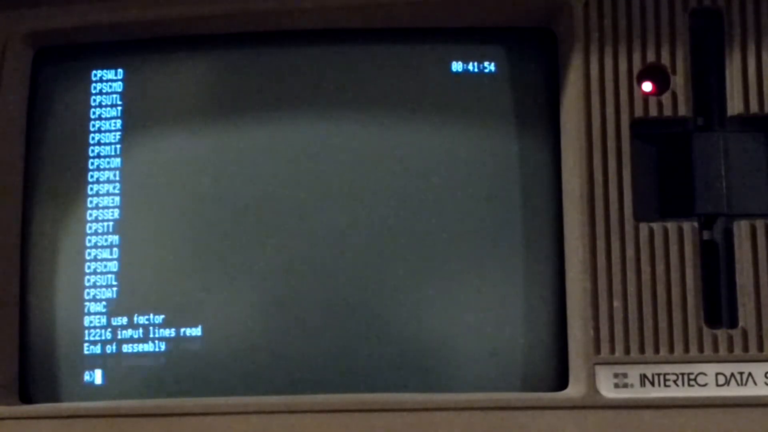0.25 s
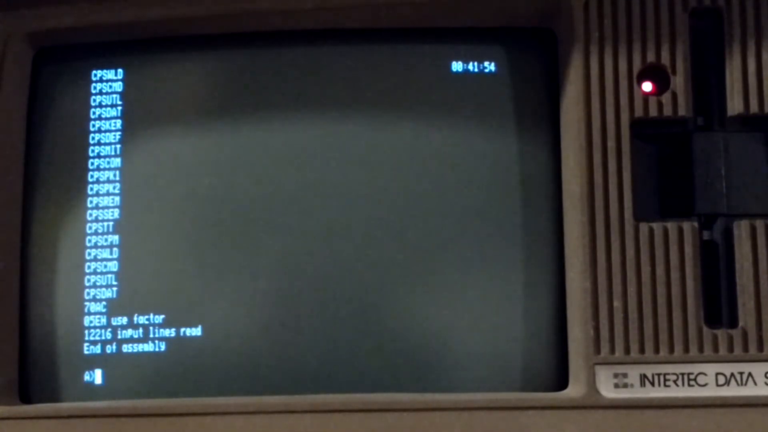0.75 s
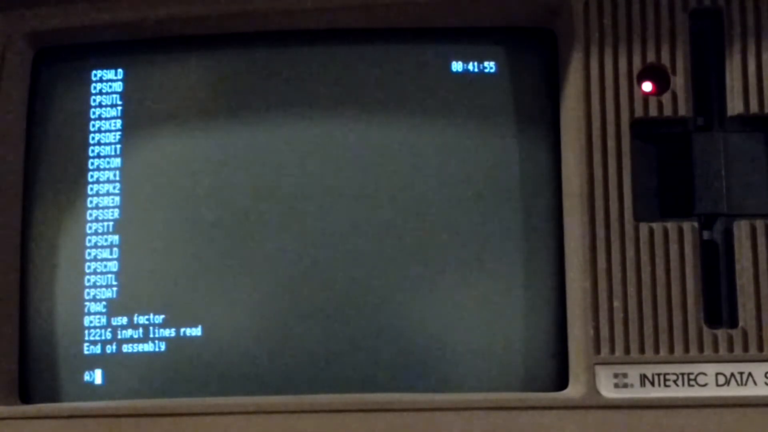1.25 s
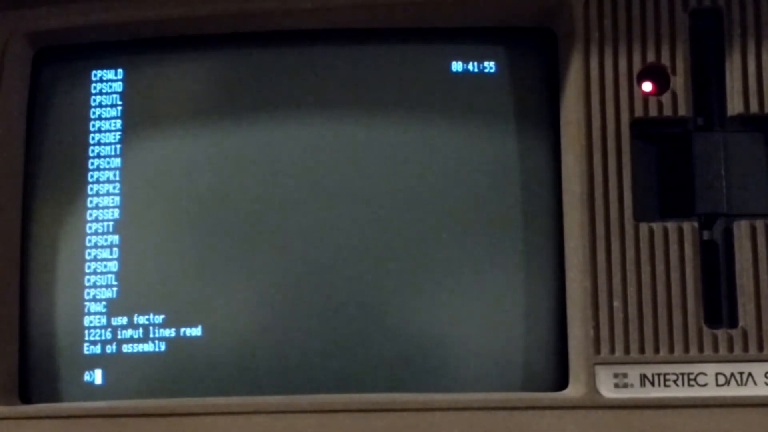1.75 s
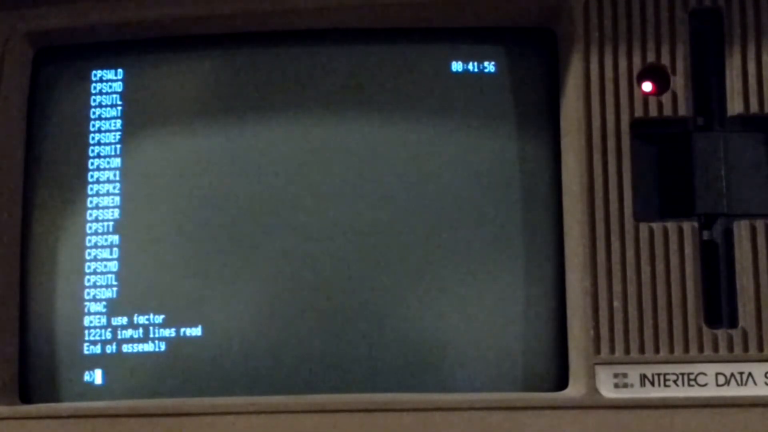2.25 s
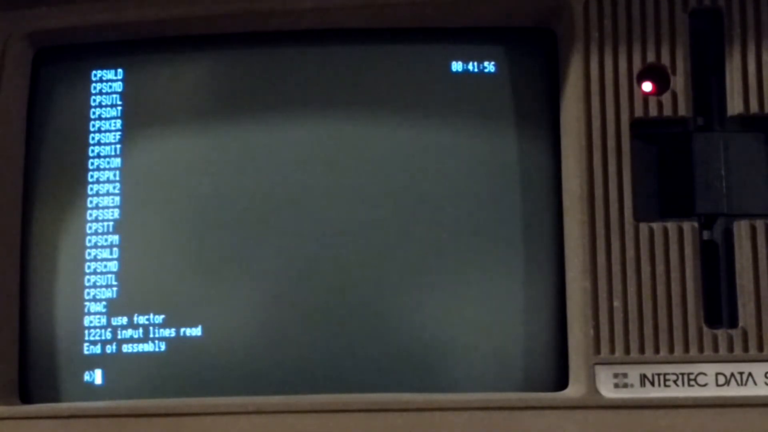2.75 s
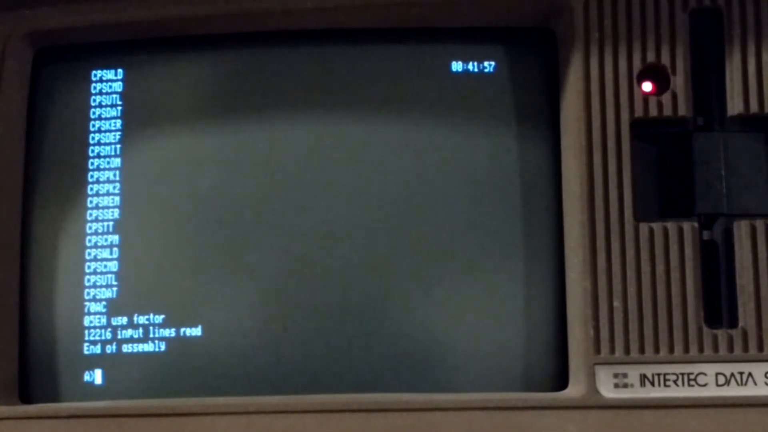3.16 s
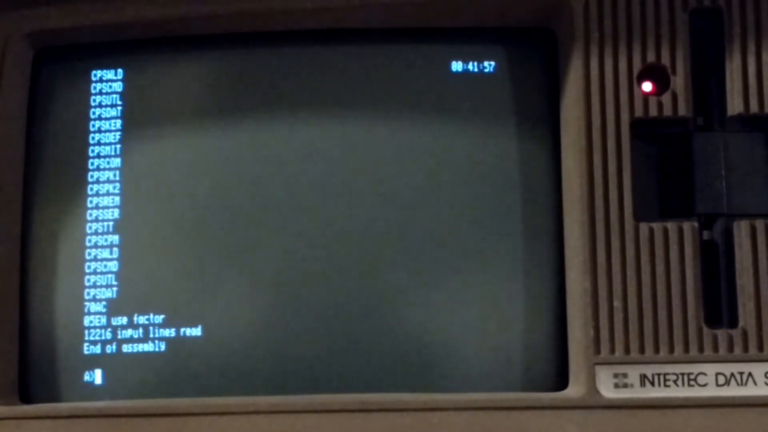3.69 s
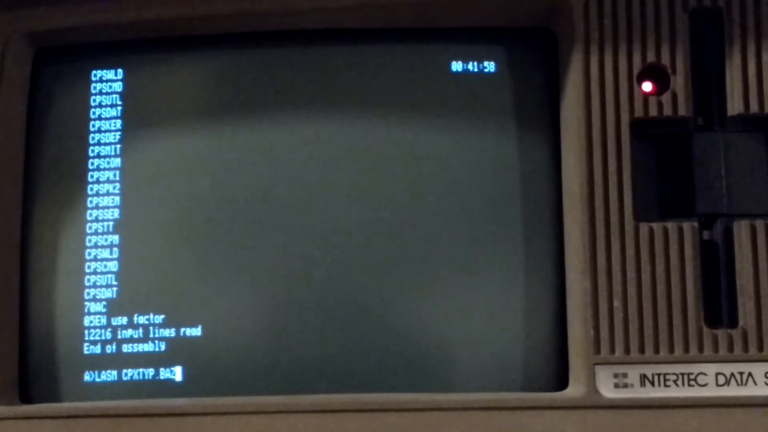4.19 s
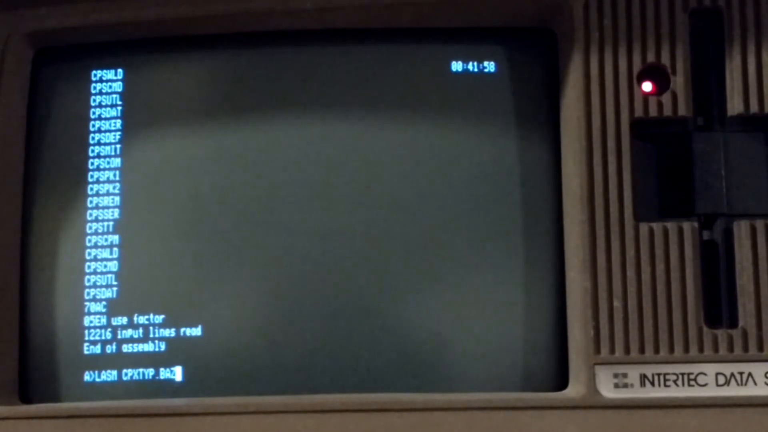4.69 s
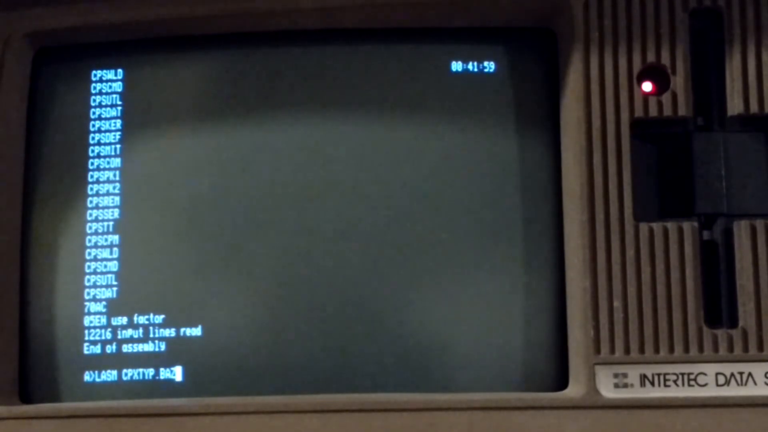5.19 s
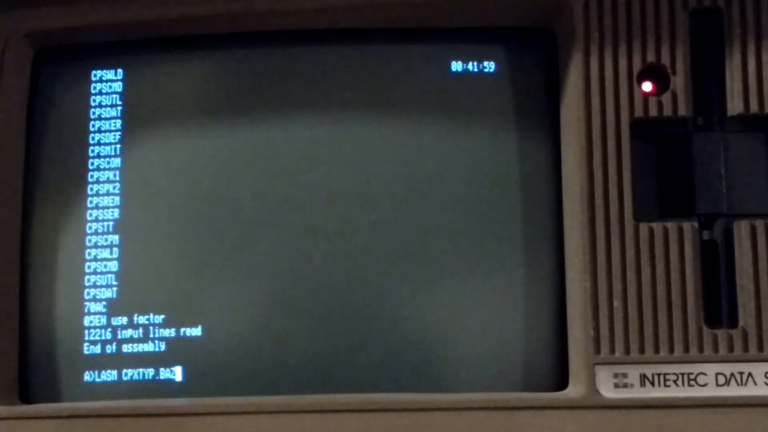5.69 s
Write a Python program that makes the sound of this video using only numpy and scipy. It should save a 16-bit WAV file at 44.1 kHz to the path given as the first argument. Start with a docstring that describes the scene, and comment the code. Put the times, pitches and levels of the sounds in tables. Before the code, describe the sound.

An old computer's floppy drive knocks, then buzzes through two long rattling head sweeps over a steady motor and fan hum, ending with scattered clunks.

```python
"""A hum of spindle motor and fan, with a disk rub that soon fades, then the knocks of a floppy drive's head.
An old desktop computer stands in a room, close to two small microphone ports. Each step of the head sums
ringing frame modes, a low thump and noise bursts for the carriage tick; shaped noise with frame modes snaps
now and then, and a small spring squeaks once. Wavering sines make the motor lines and the picture tube's whine,
coloured noise the fan and disk; the room answers the head with decaying noise."""
import sys
import numpy as np
from scipy import signal
from scipy.fft import rfft, irfft, next_fast_len
from scipy.io import wavfile
from scipy.ndimage import map_coordinates

SR = 44100
rng = np.random.default_rng(int(sys.argv[2]) if len(sys.argv) > 2 else 0)


def materialize(psi):
    """Save the field psi as 16-bit PCM at rate SR to the path in sys.argv[1].

    A 1-D psi becomes a single channel; in a 2-D psi each row is a channel.
    """
    bounded = np.clip(np.atleast_2d(psi).T, -1, 1)
    quanta = np.round(bounded * 32767).astype(np.int16)
    wavfile.write(sys.argv[1], SR, quanta)


N = 261925

# Scattered sound of the room. Each row: frequency in Hz, time to fall 60 dB in s.
ROOM_T60 = [(150, 0.61), (800, 0.013), (4000, 0.45), (12000, 0.13)]
# Colour of the room's answer. Each row: frequency in Hz, gain in dB against the direct sound.
ROOM_GAIN = [(130, -20), (300, -5), (450, -9), (900, -14), (2000, -14), (2500, -23), (3000, -13),
             (4200, -11), (4950, -24), (5700, -11), (7000, -9), (13000, -12)]
# Phase between the two microphone ports. Each row: frequency in Hz, lead of the left port in radians.
PORT_LEAD = [(110, 1.5), (180, 1.3), (280, .6), (450, .7), (650, 1), (800, .55), (950, .25), (1250, .1),
             (1700, .4), (2300, 0)]
# Balance of the two ports. Each row: frequency in Hz, left level minus right level in dB.
PORT_BALANCE = [(170, .5), (330, -2), (490, -7), (700, -.8), (1200, 0), (2600, 0), (3000, -3), (3700, 0),
                (5100, 0), (5700, -2.5), (8300, -2.5), (10000, 0)]
# Colour of the fan's air. Each row: frequency in Hz, relative density in dB per Hz.
FAN_AIR = [(25, -14), (65, -75), (110, 0), (180, -2), (300, -5.5), (415, -5.5), (460, 7), (565, -2.5),
           (670, 8), (780, -6), (860, 1), (990, -0.5), (1150, -10.5), (1550, -7), (2200, -51), (5000, -99)]
# Colour of the spinning disk's hiss. Each row: frequency in Hz, relative density in dB per Hz.
DISK_HISS = [(600, 1.5), (2000, 10), (3400, 7.5), (4600, -2), (7000, 1.5), (8700, 1.5), (11000, -4),
             (15500, -14)]
# Steady lines of spindle motor and fan. Each row: frequency in Hz, mean rms level in dB at the source.
MOTOR_LINES = [(178.8, -56.5), (317, -67), (346, -67), (441.6, -53.5), (473.7, -55), (505.8, -55),
               (606, -71), (636, -68.5), (669.5, -54), (694, -59.5), (855.9, -63.5), (942.1, -62.5),
               (1004, -62), (1283, -66)]
# Level of the disk rubbing in its jacket. Each row: time in seconds, rms level in dB before the flutter.
RUB_LEVEL = [(0, -51.5), (.22, -53.5), (.4, -60.5), (.6, -68), (5.94, -89)]
# Colour of that rub. Each row: frequency in Hz, relative density in dB per Hz.
JACKET_RUB = [(900, -34), (1600, 14.5), (1800, 22), (2000, 13.5), (4200, 7), (6000, 3), (12000, -53)]
# Squeaks of the spring as the head settles. Each row: start in seconds, relative level in dB.
SPRING_SQUEAKS = [(3.097, -24)]
# Moves of the head. Each row: start in seconds, number of steps, direction (+1 in, -1 out),
# relative knock level in dB, relative tick level in dB.
HEAD_MOVES = [(0.174, 2, 1, -35.5, -55), (0.452, 2, 1, -29.5, -46), (0.8826, 32, 1, -31, -42.5),
              (2.02, 36, -1, -30, -45), (3.726, 2, 1, -36, -52), (3.998, 2, 1, -31, -45),
              (4.549, 3, 1, -32.5, -42), (4.641, 1, 1, -30, -38.5), (5.134, 1, 1, -33, -43.5),
              (5.933, 1, 1, -28, -55)]
# Pull of the motor's four coils. Each entry: extra level in dB.
COIL_PULL_DB = [5.5, 3.14, -1.5, 1.2]
# Steps harder or softer than the rest of their move. Each row: time in seconds, extra knock in dB,
# extra tick in dB.
UNEVEN_STEPS = [(0.883, -3.5, -1.5), (0.913, -1, -1), (0.943, -2.5, 3), (0.973, 3.5, 4), (1.063, 0.5, 2),
                (1.093, 2, 4), (1.123, 1, 1), (1.213, 1, 4.5), (1.243, 0.5, -1), (1.303, -2.5, 0),
                (1.333, -0.5, 3), (1.513, 1, 2), (1.543, 2.5, 0), (1.663, 2, 1), (1.813, 0, -3),
                (2.02, 2, -2), (2.05, 0.5, 3), (2.08, -2, 4), (2.26, 2.5, 3), (2.32, 2, 3.5),
                (2.44, 2, -1.5), (2.5, 0, -0.5), (2.53, 1.5, -4), (2.59, 3.5, -1), (2.8, 0.5, -3),
                (2.83, 2, 4), (2.98, -2, 0), (3.01, -1.5, -4), (4.549, -1.5, -3), (4.609, 3, 1.5)]
# Lateness of the rotor, one row for each coil. Each row: delay inward in s, delay outward in s.
COIL_DELAY = [(0, -.00008), (-.00023, -.00016), (.00069, -.00005), (-.00044, .00029)]
# The drive rocking on its mounts. Each row: frequency in Hz, relative level in dB, 60 dB decay in s.
MOUNT_MODES = [(101, -12, .3), (134, 0, .28), (167, -14, .25), (234, -22, .22), (367, -18, .2)]
# Sharp snaps of the head mechanism. Each row: start in seconds, relative level of the body in dB,
# of the sizzle in dB, of the clack in the frame in dB.
HEAD_SNAPS = [(0.1787, -37.5, -38, -48), (0.4863, -31.5, -47, -37.5), (0.882, -40.5, -47, -59),
              (0.909, -41.5, -53, -63), (1.2445, -55, -59, -44), (1.365, -45, -55, -27.5),
              (1.396, -49, -60, -48), (2.1665, -46, -58, -35), (2.9166, -38, -51.5, -39),
              (2.9811, -38, -39.5, -38), (3.0709, -32, -48, -33.5), (3.7311, -38, -39, -42),
              (4.0372, -32, -44, -34.5), (4.551, -40, -49, -59), (4.6437, -47, -62, -33.5),
              (5.1382, -50, -60, -40)]
# Colour of a snap's body. Each row: frequency in Hz, relative density in dB per Hz.
SNAP_BODY = [(500, -33), (1500, 11), (3200, 12), (5000, 0.5), (7000, 0.5), (9500, 12), (11500, -0.5),
             (15500, -43)]
# Colour of a snap's thin top. Each row: frequency in Hz, relative density in dB per Hz.
SNAP_SIZZLE = [(9000, -39), (12000, -21), (13600, 0), (15500, -2)]
# Seating of the carriage, inward row then outward row. Each row: tick delay in s, rebound delay in s,
# rebound level in dB against the tick.
CARRIAGE_SEATING = [(.0015, 0.0085, -5), (-.001, .008, -1)]
# Colour of the carriage tick. Each row: frequency in Hz, relative density in dB per Hz.
CARRIAGE_TICK = [(400, -30), (750, 21), (1100, 16.5), (1500, 23.5), (2300, 8), (3000, 23), (3800, 13.5),
                 (4600, -10), (5300, 16.5), (6600, 10.5), (7100, 12), (8000, 12), (9500, -1), (12000, -11),
                 (15500, -31)]
# Resonances of drive frame and case. Each row: frequency in Hz, relative level in dB, 60 dB decay in s,
# extra knock level in dB when the head moves outward.
FRAME_MODES = [(343.5, -14, 0.16, 0.5), (467, -12, 0.21, 1.5), (498.7, -7.5, 0.2, 1.5),
               (568, -6.5, 0.19, 2.5), (692, -16.5, 0.34, 4.5), (745.4, -1.5, 0.15, -1.5),
               (795, -7, 0.12, 1), (831, -6.5, 0.23, -3.5), (858, 2, 0.21, -4), (937.6, -4.5, 0.21, -2),
               (1078, -23, .11, 17), (1150, -17, 0.28, -1), (1287, -9.5, 0.17, 3.5), (1466, -10, 0.21, -1),
               (1494, -11, 0.063, 9), (1556, -11, 0.073, 3), (1592, -7, 0.17, -0.5),
               (1860, -13.5, 0.097, 7.5), (1902, -4, .08, -11), (2284, -6.5, 0.1, -23)]
# Dense smaller resonances of the case. Each row: frequency in Hz, relative density in dB per Hz.
CASE_RATTLE = [(30, -27), (75, -50), (105, -5), (220, -20.5), (300, -14), (400, -18), (470, -3), (900, 0),
               (1100, -5.5), (1600, -5), (2100, -7), (3000, -18), (4500, -24.5), (15000, -40)]
# Decay of those resonances. Each row: frequency in Hz, time to fall 60 dB in s.
CASE_DECAY = [(200, 0.58), (600, 0.31), (1500, 0.21), (4000, 0.16), (12000, 0.24)]

COILS = len(COIL_PULL_DB)
STEP_IN_S, STEP_OUT_S = .029994, .02997  # from one track to the next


def amp(db):
    """Decibels to gain."""
    return 10 ** (np.asarray(db) / 20)


def unit(x, seconds=None):
    """x scaled to rms 1, over all of it or over its first seconds."""
    head = x if seconds is None else x[..., :int(seconds * SR)]
    return x / np.sqrt(np.mean(head ** 2, axis=-1, keepdims=True) + 1e-20)


def along(points, hz):
    """Values between (Hz, value) points, read on a log frequency axis."""
    f, v = np.transpose(points)
    return np.interp(np.log(hz + 1), np.log(f + 1), v)


def wobble(rate):
    """A smooth random curve, rate knots a second."""
    knots = rng.standard_normal(int(N * rate / SR) + 4)
    return map_coordinates(knots, [np.arange(N) * rate / SR])


def filtered(x, response):
    """x shaped by a complex response of frequency."""
    n = x.shape[-1]
    m = next_fast_len(n + 4096)
    return irfft(rfft(x, m) * response(np.fft.rfftfreq(m, 1 / SR)), m)[..., :n]


def noise(spectrum, shape):
    """Noise of rms 1 with the given colour."""
    return unit(filtered(rng.standard_normal(shape), lambda hz: amp(along(spectrum, hz))))


def part_repeated(spectrum, kind, kinds, length, share):
    """One noise for each step: a share of its power belongs to its kind, the rest is fresh."""
    own = noise(spectrum, (kinds, length))[kind]
    fresh = noise(spectrum, (len(kind), length))
    return np.sqrt(share) * own + np.sqrt(1 - share) * fresh


def dying(x, t60s):
    """Each frequency of x fades at its own speed."""
    hz, t, z = signal.stft(x, SR, nperseg=256)
    fade = amp(-60 * t / along(t60s, hz)[:, None])
    return signal.istft(z * fade, SR, nperseg=256)[1][..., :x.shape[-1]]


def placed(times, sounds):
    """One track with each sound starting at its time."""
    track = np.zeros(N + SR)
    for s, sound in zip(times, sounds):
        track[max(round(s * SR), 0):][:len(sound)] += sound
    return track[:N]


def ports(x, lag_s=.0004):
    """Two ports hear x with different level and phase; the treble reaches the left one late and inverted."""
    side = np.array([[1], [-1]])

    def response(hz):
        phase = along(PORT_LEAD, hz) - np.maximum(2 * np.pi * hz * lag_s - np.pi, 0)
        # each port takes half of the difference
        return amp(side * along(PORT_BALANCE, hz) / 2) * np.exp(.5j * side * phase)

    return filtered(x, response)


def room(x, gap_s=.002):
    """A short diffuse answer from the walls, different at each port."""
    tail = dying(rng.standard_normal((2, SR // 3)), ROOM_T60)
    tail = tail / np.linalg.norm(tail, axis=1, keepdims=True)
    tail = np.pad(tail, ((0, 0), (int(gap_s * SR), 0)))
    answer = signal.fftconvolve(x[None], tail, axes=1)[:, :N]
    return filtered(answer, lambda hz: amp(along(ROOM_GAIN, hz)))


def ambience(air_db=-54, hiss_db=-62):
    """Fan noise scattered round the room differs from port to port; port spacing hollows its hiss."""
    left, right = ports(noise(DISK_HISS, N))
    other_left, other_right = ports(noise(DISK_HISS, N))
    mid, side = (left + right) / 2, (other_left - other_right) / 2
    return amp(air_db) * noise(FAN_AIR, (2, N)) + amp(hiss_db) * np.array([mid + side, mid - side])


def tube(db=-68, line_hz=15434):
    """The picture tube's line transformer whines, in opposite phase at the two ports."""
    t = np.arange(N) / SR
    whine = np.sqrt(2) * np.sin(2 * np.pi * line_hz * t)
    port_gains = np.array([[.6], [-1.2]])
    return amp(db + 0.53 * wobble(1.7)) * whine * port_gains


def machine(air_db=-48.0, hiss_db=-54.0, motor_hz=32.2, flutter_db=1.12):
    """Wavering motor lines over fan air, hiss and rub; the noise flutters with each turn of the spindle motor."""
    t = np.arange(N) / SR
    hum = 0
    for hz, db in MOTOR_LINES:
        level = amp(db + 1.74 * wobble(4.4))
        drift = hz / 450 * (0.071 * wobble(4.43) + 0.82 * wobble(1.565))  # radians
        hum = hum + level * np.sqrt(2) * np.sin(2 * np.pi * (hz * t + rng.random()) + drift)
    turn_db = flutter_db * np.sin(2 * np.pi * motor_hz * t + wobble(1.77)) + 0.48 * wobble(25)
    rub = amp(np.interp(t, *np.transpose(RUB_LEVEL))) * noise(JACKET_RUB, N)
    air = amp(air_db) * noise(FAN_AIR, N)
    hiss = amp(hiss_db) * noise(DISK_HISS, N)
    return hum + amp(turn_db) * (air + hiss + rub)


def spring(ring_hz=4250, level_db=-4, t60=0.022, rise_s=0.0059, waver=.5):
    """A small spring squeaks on one unsteady, quickly dying note."""
    s, db = np.transpose(SPRING_SQUEAKS)
    t = np.arange(SR // 6) / SR
    note = np.sin(2 * np.pi * ring_hz * t + waver * wobble(500)[:len(t)])
    fade = amp(db[:, None] + level_db - 60 * t / t60)
    return placed(s, fade * note * (1 - np.exp(-t / rise_s)))


def snaps(level_db=7.0, sizzle_db=7, t60=0.036, rise_s=0.0015, tail_db=-27, tail_t60=0.1, damping=0.86):
    """A bright metal snap with a thin top and a short tail; the blow also makes the frame clack."""
    s, db, top_db, frame_db = np.transpose(HEAD_SNAPS)
    t = np.arange(SR // 6) / SR
    shape = amp(-60 * t / t60) + amp(tail_db - 60 * t / tail_t60)
    body = amp(db + level_db)[:, None] * noise(SNAP_BODY, (len(s), len(t)))
    top = amp(top_db + sizzle_db)[:, None] * noise(SNAP_SIZZLE, (len(s), len(t)))
    ring = 0
    for hz, level, life, _ in FRAME_MODES:
        phase = 2 * np.pi * (hz * t + rng.random((len(s), 1)))
        ring = ring + amp(level - 60 * damping * t / life) * np.sin(phase)
    clack = amp(frame_db)[:, None] * unit(ring, 0.0049)
    return placed(s - rise_s / 2, (shape * (body + top) + clack) * (1 - np.exp(-t / rise_s)))


def steps(out_uneven=0.5, scatter_db=.5):
    """Time, direction, coil, knock dB and tick dB of every step; the track under the head decides the coil."""
    rows = []
    for start, count, way, knock_db, tick_db in HEAD_MOVES:
        # a long move grows quieter as it runs, in dB per second
        if way > 0:
            period, knock_fade, tick_fade = STEP_IN_S, 0.24, 1.1
        else:
            period, knock_fade, tick_fade = STEP_OUT_S, 2.64, 1.2
        for t in period * np.arange(round(count)):
            rows.append((start + t, np.sign(way), knock_db - knock_fade * t, tick_db - tick_fade * t))
    s, way, knock_db, tick_db = np.transpose(rows)
    coil = (np.cumsum(way).astype(int) - 1) % COILS
    # only a share of the coils' unevenness is left on the way out
    pull_db = np.array(COIL_PULL_DB)[coil] * np.where(way > 0, 1, out_uneven)
    pull_db = pull_db + scatter_db * rng.standard_normal(len(s))
    uneven = np.array(UNEVEN_STEPS)
    matches = abs(s[:, None] - uneven[:, 0]) < STEP_IN_S / 2
    extra_knock_db, extra_tick_db = (matches @ uneven[:, 1:]).T
    return s, way, coil, knock_db + pull_db + extra_knock_db, tick_db + pull_db + extra_tick_db


def thumps(s, db, level_db=-40.3, follow=.45, rise_s=.007, cut_hz=92):
    """Every step rocks the drive on its mounts; in a long move the thumps merge into a steady low buzz."""
    t = np.arange(SR // 3) / SR
    swing = sum(amp(level - 60 * t / t60) * np.sin(2 * np.pi * hz * t) for hz, level, t60 in MOUNT_MODES)
    swing = swing * (1 - np.exp(-t / rise_s))
    # only a share of a knock's strength reaches the mounts
    strength = amp(level_db + follow * (db - db.mean()))
    rocking = placed(s, strength[:, None] * swing)
    # little of the rocking sounds below the cut
    return filtered(rocking, lambda hz: 1 - 1 / (1 + (hz / cut_hz) ** 10))


def ticks(s, way, coil, db, level_db=7, rise_s=0.0007, repeat_share=0.74, slack_s=.0006):
    """The carriage ticks at every step and rebounds once in its slack, hard on the way out."""
    t = np.arange(SR // 5) / SR
    delay, rebound_s, rebound_db = np.array(CARRIAGE_SEATING)[(way < 0).astype(int)].T
    # a dry tick and its faint after-ring
    shape = (amp(-60 * t / .025) + amp(-19 - 60 * t / .17)) * (1 - np.exp(-t / rise_s))

    def contact(times, contact_db):
        """One contact for each step, coloured partly by its coil."""
        ring = part_repeated(CARRIAGE_TICK, coil, COILS, len(t), repeat_share)
        return placed(times, amp(contact_db + level_db)[:, None] * shape * ring)

    rebound_times = s + rebound_s + slack_s * rng.uniform(-1, 1, len(s))
    return contact(s + delay, db) + contact(rebound_times, db + rebound_db)


def knocks(s, way, coil, db, lead_s=.004, rise_s=0.0063, modes_db=-5.5, case_db=-8.5, repeat_share=0.8):
    """Four coils pull in turn, each with its own knock on the frame, so every fourth step sounds alike."""
    t = np.arange(SR // 4) / SR
    outward = way < 0
    # on the way back each coil pulls against the other side of the slack
    kinds = 2 * COILS
    kind = coil + COILS * outward
    # each coil seats the rotor early or late, and no step seats exactly like the last
    late = np.transpose(COIL_DELAY).ravel()[kind] + 0.00008 * rng.standard_normal(len(s))
    ring = 0
    for k, (hz, level, t60, outward_db) in enumerate(FRAME_MODES):
        # each coil favours different modes, and each step scatters them again, in dB
        by_coil = 1.2 * rng.standard_normal(kinds)[kind]
        by_step = 2.3 * rng.standard_normal(len(s))
        strength_db = level + outward_db * outward + by_coil + by_step
        mode = (-1) ** k * amp(-60 * t / t60) * np.sin(2 * np.pi * hz * t)
        ring = ring + amp(strength_db)[:, None] * mode
    rattle = dying(part_repeated(CASE_RATTLE, kind, kinds, len(t), repeat_share), CASE_DECAY)
    knock = amp(modes_db) * unit(ring, STEP_IN_S) + amp(case_db) * unit(rattle, STEP_IN_S)
    # the pull shakes the frame ahead of the carriage tick
    return placed(s - lead_s + late, amp(db)[:, None] * knock * (1 - np.exp(-t / rise_s)))


def scene():
    """Drive and machine in one case close to the ports, with the tube beside them and the room around."""
    s, way, coil, knock_db, tick_db = steps()
    head = snaps() + spring() + thumps(s, knock_db)
    head = head + ticks(s, way, coil, tick_db) + knocks(s, way, coil, knock_db)
    return room(head) + ambience() + tube() + ports(head + machine())


def record(dry, low_cut_hz=55, top_hz=15900):
    """The microphone channel cuts the deep bass and keeps nothing above its band limit."""
    return filtered(dry, lambda hz: (hz < top_hz) * hz / np.hypot(hz, low_cut_hz))


dry = scene()
out = record(dry)
materialize(out)
```